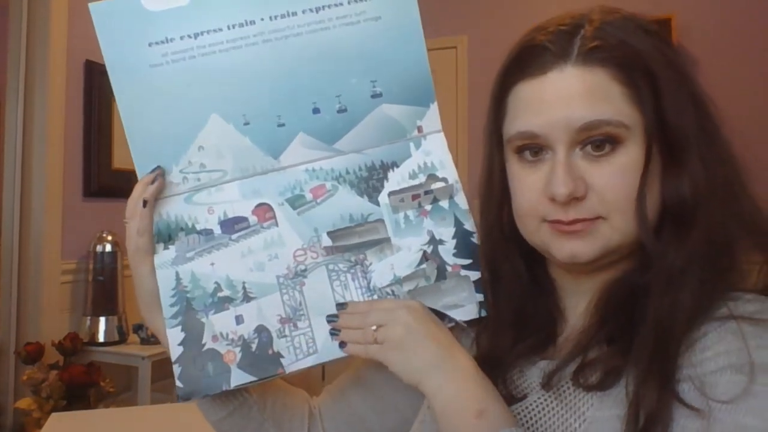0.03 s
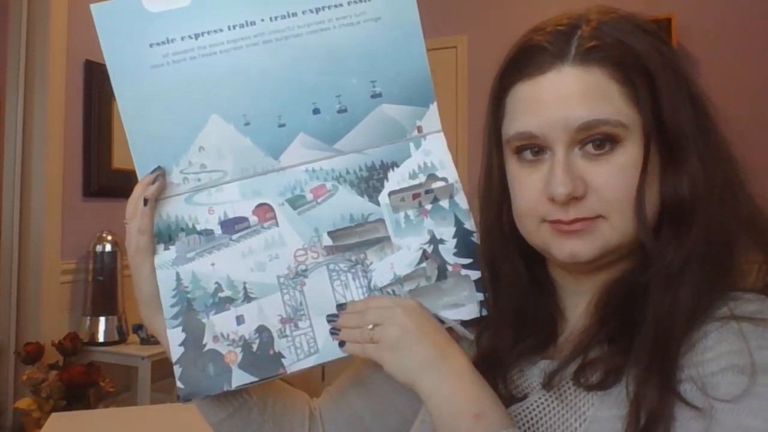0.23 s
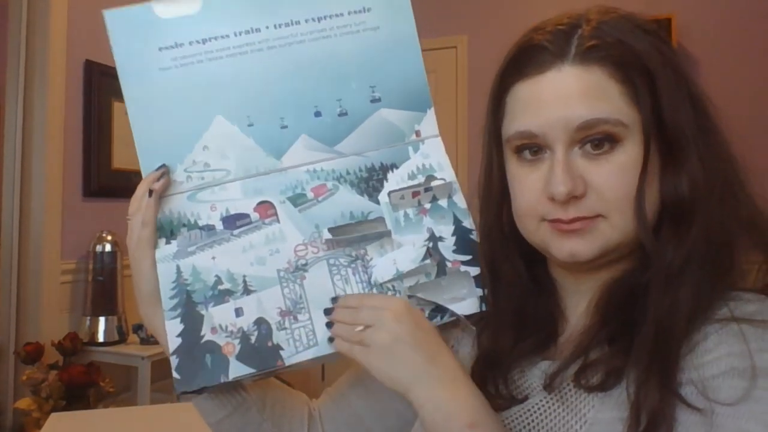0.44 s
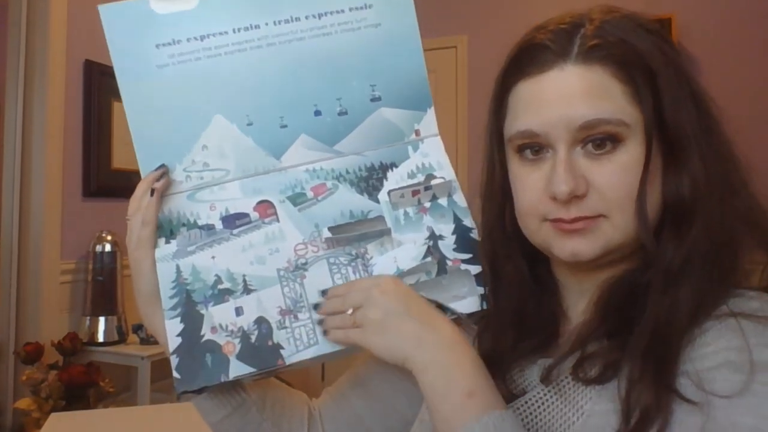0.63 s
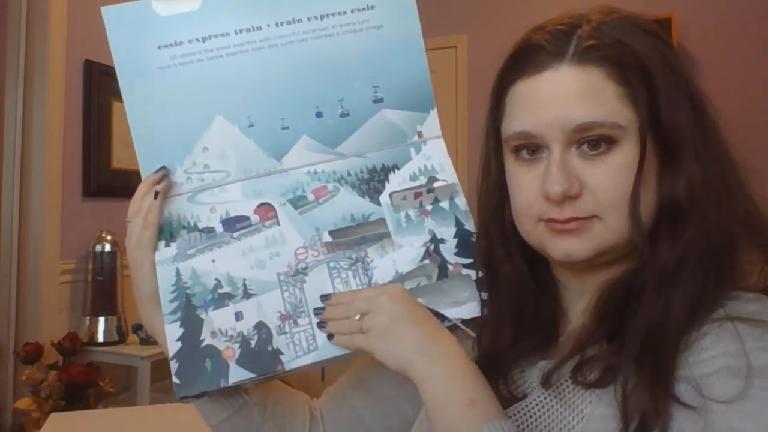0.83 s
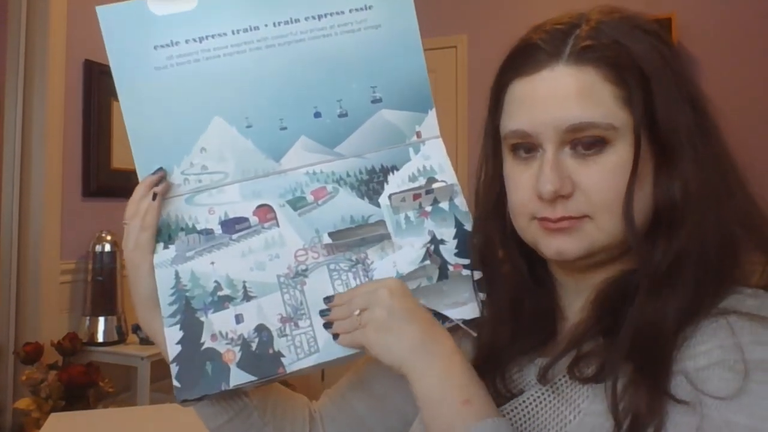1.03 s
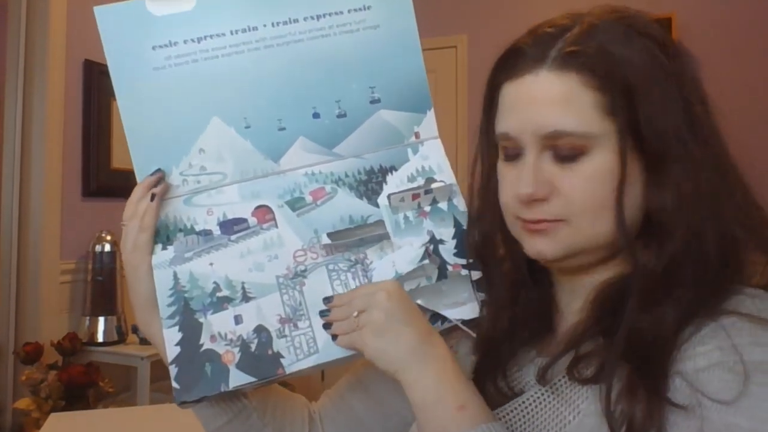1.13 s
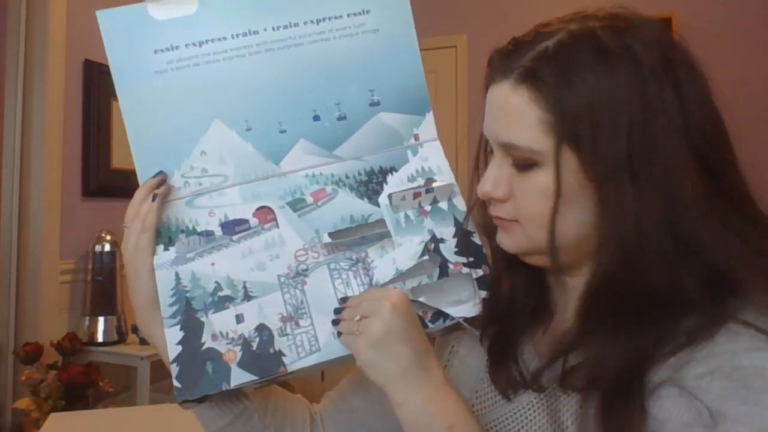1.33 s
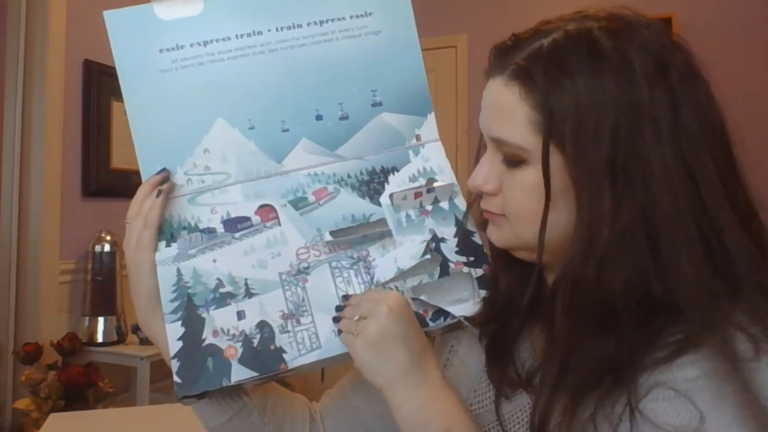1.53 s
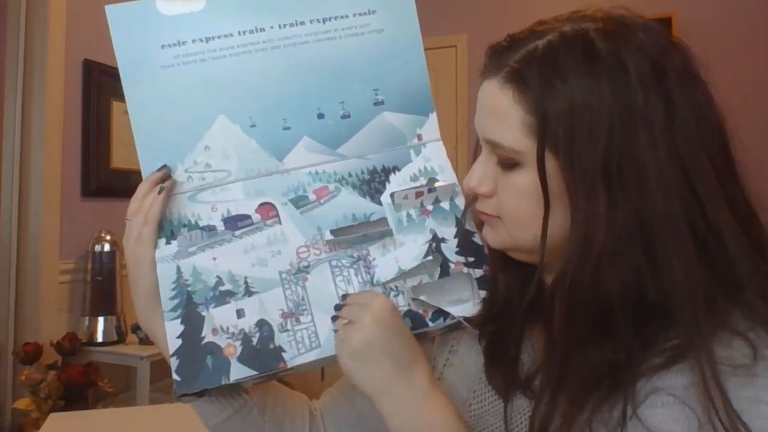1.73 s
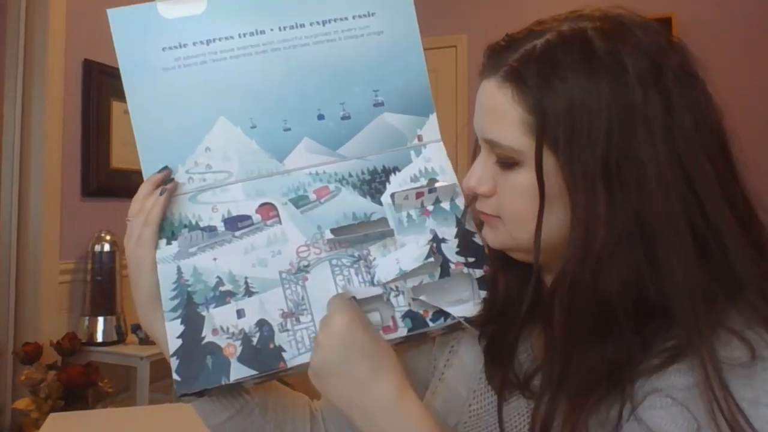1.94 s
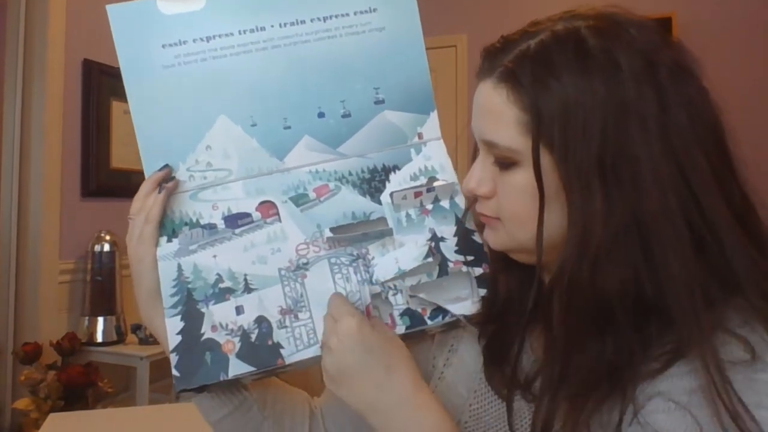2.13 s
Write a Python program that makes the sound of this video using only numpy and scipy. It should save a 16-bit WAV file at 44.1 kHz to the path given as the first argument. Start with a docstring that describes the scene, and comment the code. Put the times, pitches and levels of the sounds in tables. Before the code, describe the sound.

Fingers tear open a perforated cardboard door, with crisp pops, hollow knocks and a brief rip.

```python
"""Tearing open a cardboard box

Close to a stereo microphone in a small furnished room, fingers tear open a perforated door in stiff card.
Fibre bridges snap one by one and ring the hollow box; a longer rip crackles near the end. In between,
fingers rub, bump and knock the card. The box sits a little to the right, and the room adds a short tail."""
import sys
import numpy as np
from scipy import signal
from scipy.fft import rfft, irfft
from scipy.io import wavfile

SR = 44100
rng = np.random.default_rng(int(sys.argv[2]) if len(sys.argv) > 2 else 0)


def int16_out(signal):
    """Quantize to a 16-bit WAV file."""
    q = np.round(np.clip(np.atleast_2d(signal).T, -1, 1) * 32767)
    wavfile.write(sys.argv[1], SR, q.astype(np.int16))


N = 97020
T = np.arange(N) / SR
SIDES = np.array([[1], [-1]])  # left, right

# Fingers rubbing the card: t/s, level/dB, treble/dB re level
RUB_CURVE = [(0, -58.5, -10.5), (.14, -77, -5), (.18, -63, -22), (.52, -77.5, -13.5), (.545, -61.5, -14),
             (.67, -71.5, -7), (.70, -59.5, 3.5), (.74, -71, -4), (.78, -87, 7), (.81, -75.5, 14),
             (.82, -66.5, 9.5), (.93, -71, 6), (1.0, -40, 3), (1.2, -79, -5.5), (1.24, -60.5, -1.5),
             (1.32, -69, 6.5), (1.36, -57, -16), (1.41, -82.5, -1), (1.47, -75, 9), (1.49, -88, 36),
             (1.53, -59, -7), (2.1, -70.5, 8.5), (2.2, -79, -8)]
# Spectra of the rub, middle and treble: f/Hz, level/dB
RUB_COLOUR = [(380, -29.5), (620, 5), (2300, -1), (8000, -18)]
RUB_TREBLE_COLOUR = [(3000, -63.5), (7000, -8.5), (11000, -10), (14000, -2)]
# Modes of the hollow box: f/Hz, level/dB, t60/s
BOX_MODES = [(410.8, 7.5, 0.043), (481.7, 5, 0.036), (520, -5.5, 0.05), (601, -2.5, 0.067),
             (725, -2.5, 0.048), (875, 2.5, 0.029), (988, -16.5, 0.17), (1100, -24, 0.099),
             (1149, 3, 0.032), (1420, -9.5, .04)]
# Fibre bridges breaking: t/s, level/dB, treble/dB re level, box ring/dB re level, bite f/Hz
SNAPS = [(0.0142, -34.5, -37.5, -45.5, 2260), (.0506, -38, -29, -14, 2320),
         (.0728, -32.5, -39.5, -29.5, 2130), (.0876, -42, -13.5, -6.5, 2130),
         (0.1008, -38.5, 0.5, -7, 2170), (0.214, -3.5, -15.5, -17.5, 3350), (0.2223, -7, -24, -7.5, 2210),
         (.2314, -12, -3.5, -34, 1720), (0.8926, -38, -6, -4.5, 1920), (0.9209, -41, 2, -10.5, 2660),
         (0.9356, -38, -3.5, 2.5, 2000), (0.9798, -28.5, -9.5, -24.5, 1980), (1.0106, -7.5, -4, -14, 1596),
         (1.0194, -22.5, -5, -2, 3090), (1.0648, -17, -21, -8.5, 2050), (1.0794, -19.5, -14, -10, 2305),
         (1.1523, -46, -33.5, -21, 2220), (1.177, -38, -10, -4.5, 1460), (1.421, -41, -25.5, -16, 1417),
         (1.438, -39.5, -26, -13.5, 1910), (1.479, -40, 2.5, -46, 4520), (1.535, -2.5, -13, -13, 3060),
         (1.5372, -6.5, -10, -14.5, 2055), (1.5699, -14.5, -5, -14, 2570),
         (1.5776, -15.5, -0.5, -14.5, 3660), (1.714, -34.5, 1, -8, 4970), (1.7395, -32.5, 1, -12, 3780),
         (1.7668, -22, 0, -33, 3420), (1.7771, -15.5, 0.5, -51, 3070), (1.809, -25.5, 1, -48, 3500),
         (1.846, -25, 4, -37, 3510), (1.857, -30, -9, -31, 3300)]
# Spectra of a snap's papery middle and of the treble of snaps and rip: f/Hz, level/dB
SNAP_COLOUR = [(300, -25), (600, -6), (1500, 2.5), (3400, -2), (8000, -12), (11000, -59.5)]
TEAR_TREBLE_COLOUR = [(1500, -83.5), (4000, -3), (6000, -5.5), (13000, -0.5), (16000, 1)]
# Dull handling bumps, and the box's low ring just after some snaps: t/s, level/dB, f/Hz
BUMPS = [(0.216, -36, 175), (0.466, -44.5, 106.8), (0.507, -49, 78), (0.673, -40, 70.7), (0.697, -43, 98),
         (0.721, -37.5, 97), (0.744, -41, 31), (1.013, -33.5, 130), (1.04, -39, 49.4), (1.537, -33.5, 183),
         (1.558, -34, 171), (2.082, -48.5, 179.6)]
# Finger knocks and flexes of the box: t/s, level/dB, favoured f/Hz
KNOCKS = [(0.544, -29, 405), (.582, -33.5, 430), (0.648, -32.5, 460), (0.702, -22.5, 450.4),
          (.7035, -18.5, 875), (.723, -30, 457), (.745, -31.5, 875), (0.893, -24, 380), (0.935, -36.5, 405),
          (1.032, -12.5, 407), (1.075, -29, 416), (1.158, -31, 400), (1.254, -31.5, 1420),
          (1.437, -36, 624), (1.439, -27.5, 1100), (1.593, -37, 431), (1.775, -26, 610),
          (1.905, -28.5, 480), (1.948, -24.5, 520), (2.078, -20.5, 458), (2.09, -27.5, 478)]
# Card creasing under the fingers: t/s, level/dB
CREASES = [(.595, -49.5), (0.623, -51), (0.654, -48.5), (0.757, -48.5)]
# The long rip: t/s, level/dB, treble/dB re level
RIP_CURVE = [(1.705, -51, 1), (1.73, -41, 4), (1.765, -31.5, 2.5), (1.79, -44, 9), (1.825, -52, 2),
             (1.84, -45, 4), (1.85, -25.5, -1), (1.87, -44, 7.5), (1.91, -37.5, 5.5), (1.95, -41.5, 2.5),
             (1.99, -52.5, 10), (2.03, -90.5, 17.5)]
# Spectrum of the rip's middle: f/Hz, level/dB
RIP_COLOUR = [(400, -60), (1600, -10.5), (2030, -2), (2500, -1), (4000, -4), (8000, -7.5), (11000, -39)]
# Spectrum of the room tone: f/Hz, level/dB
ROOM_TONE = [(30, -9.5), (84, -16), (180, -16.5), (260, -28.5), (460, -42), (1250, -54.5), (3600, -42),
             (16000, -52)]
# Room decay by band: f/Hz, t60/s
ROOM_T60 = [(150, 0.22), (300, 0.2), (700, 0.34), (1800, 0.27), (4800, 0.29), (12000, 0.26)]
# Room tail in the same bands: level/dB
ROOM_DB = [20, -2.5, -1, -3.5, -4.5, -5.5]
# Stereo width in the same bands: side/mid ratio
ROOM_WIDTH = [.2, .25, .35, .6, .9, .95]

SNAP_ATTACK_S, SNAP_DECAY_S, BITE_WIDTH = 0.00037, 0.001, .24  # width as a share of the pitch
FIRM_DB, SOFT_RANGE_DB = -20, 14  # snaps under FIRM_DB turn into creaks over this range
KNOCK_ATTACK_S, KNOCK_SPREAD_OCT = 0.00584, 0.071
GRAIN_S, SLIP_FROM_S, SLIPS_PER_S = 0.00072, 1.8705, 97
ROOM_ONSET_S, PATH_SPREAD_S = 0.003, 0.0059
BODY_PAN_DB, TREBLE_PAN_DB = -1, -4  # left re right
BODY_LOW_HZ, TOP_HZ = 330, 15900


def amp(db):
    """dB to gain."""
    return 10 ** (np.asarray(db, float) / 20)


def colour(x, points):
    """Causal filter shaped by f/Hz, level/dB points, keeping the power of white noise."""
    hz, db = np.array(points, float).T
    log_gain = np.interp(np.log(np.linspace(1, SR / 2, 4097)), np.log(hz), db) * np.log(10) / 20
    cepstrum = irfft(log_gain)
    cepstrum[1:4096] *= 2  # fold to minimum phase
    cepstrum[4097:] = 0
    h = irfft(np.exp(rfft(cepstrum)))
    filtered = signal.fftconvolve(x, np.broadcast_to(h, x.shape[:-1] + h.shape), axes=-1)
    return filtered[..., :N] / np.sqrt(np.sum(h ** 2))


def add(track, at_s, x):
    """Mix a sound into a track."""
    i = int(at_s * SR)
    track[i:i + len(x)] += x[:N - i]


def box_ring(db, attack_s, favour_hz=None):
    """One blow on the hollow box: every mode rings down with a chance sign and size."""
    hz, mode_db, t60 = np.array(BOX_MODES, float).T[..., None]
    size, sign = rng.standard_normal((2, len(BOX_MODES), 1))
    gains = amp(mode_db + 2.4 * size)
    if favour_hz:
        gains = gains * np.exp(-.5 * (np.log2(hz / favour_hz) / KNOCK_SPREAD_OCT) ** 2)
    t = T[:SR // 5]
    modes = np.sign(sign) * gains * np.sin(2 * np.pi * hz * t) * 1000. ** (-t / t60)
    attack = (1 - np.exp(-t / attack_s)) ** 2
    return amp(db) * modes.sum(axis=0) * attack / np.sqrt(np.sum(gains ** 2))


def friction(curve, mid_colour, treble_colour, per_s, scatter_db, box_db):
    """Uneven fibre clicks follow a level curve and ring the box; gives middle and treble."""
    clicks = rng.random(N) < per_s / SR
    sizes = clicks * amp(scatter_db * np.minimum(rng.exponential(size=N), 3))
    grain = np.exp(-T[:SR // 100] / GRAIN_S)
    crackle = np.sqrt(np.convolve(sizes ** 2, grain)[:N]) * rng.standard_normal(N)
    crackle /= np.sqrt(np.mean(crackle ** 2))
    times, db, treble_db = np.array(curve, float).T
    mid = crackle * amp(np.interp(T, times, db, -140, -140))
    treble = crackle * amp(np.interp(T, times, db + treble_db, -140, -140))
    response = np.diff(box_ring(0, SNAP_ATTACK_S))
    box = signal.fftconvolve(mid, response)[:N] * amp(box_db) / np.sqrt(np.sum(response ** 2))
    return np.array([colour(mid, mid_colour) + box, colour(treble, treble_colour)])


def finger_rub():
    """Fingers slide over the card: a quiet, fairly even grain."""
    return friction(RUB_CURVE, RUB_COLOUR, RUB_TREBLE_COLOUR, per_s=420, scatter_db=1.5, box_db=0.5)


def fibre_snaps(rows):
    """Fibres give way: a papery burst with a pitched bite rings the box; gives middle and treble."""
    paper, treble, box = np.zeros((3, N))
    t = T[:SR // 20]
    for at_s, db, treble_db, box_db, hz in rows:
        soft = np.clip((FIRM_DB - db) / SOFT_RANGE_DB, 0, 1)
        slowed = t / (1 + 2.2 * soft)  # soft creaks last longer and lose their papery middle
        shape = (1 - np.exp(-slowed / SNAP_ATTACK_S)) ** 2 * np.exp(-slowed / SNAP_DECAY_S)
        bursts = shape * rng.standard_normal((3, len(t)))
        bite = soft * bursts[2] + (1 - soft) * np.abs(bursts[2]) * np.sin(2 * np.pi * hz * t)
        bursts[2] = signal.lfilter(*signal.iirpeak(hz, (1 + soft) / BITE_WIDTH, fs=SR), bite)
        bursts *= np.sqrt(np.sum(shape ** 2) / np.sum(bursts ** 2, axis=1, keepdims=True))
        add(paper, at_s, amp(db + 1.5 - 12 * soft) * bursts[0])
        add(treble, at_s, amp(db + treble_db + 8.5) * bursts[1])
        add(box, at_s, box_ring(db + box_db + 0.5, SNAP_ATTACK_S))
        add(box, at_s, amp(db) * bursts[2])
    return np.array([colour(paper, SNAP_COLOUR) + box, colour(treble, TEAR_TREBLE_COLOUR)])


def low_bumps():
    """The box gives dull low bumps, from handling or ringing low after a snap: a cycle or two of a low tone
    that swells and dies, in stereo."""
    low = np.zeros(N)
    for at_s, db, hz in BUMPS:
        cycles = T[:SR // 4] * hz
        swell = cycles / .7 * np.exp(1 - cycles / .7)
        add(low, at_s, amp(db) * swell * np.sin(2 * np.pi * cycles))
    return low + 0.27 * SIDES * np.roll(low, SR // 100)


def finger_knocks():
    """Soft contacts wake the box modes near their own pitch."""
    box = np.zeros(N)
    for at_s, db, hz in KNOCKS:
        add(box, at_s - KNOCK_ATTACK_S, box_ring(db + 3.5, KNOCK_ATTACK_S, hz))
    return box


def crease_ticks():
    """The card ticks faintly as it creases; gives snap rows."""
    return [(at_s, db, -18, 0, 1700) for at_s, db in CREASES]


def long_rip():
    """The tear runs on through the fibres: a dense, ragged crackle."""
    return friction(RIP_CURVE, RIP_COLOUR, TEAR_TREBLE_COLOUR, per_s=8800, scatter_db=5, box_db=-13.5)


def tear_slips():
    """The tear catches and lets go in nine near-regular jerks; gives snap rows."""
    return [(SLIP_FROM_S + (k + .06 * lag) / SLIPS_PER_S, -27 + 2 * size, -14, -25,
             2050 * (1 + .05 * pitch))
            for k, (lag, size, pitch) in enumerate(rng.standard_normal((9, 3)))]


def room_tail(x):
    """The room's short reverberation fades band by band, wider in the treble."""
    hz, t60 = np.array(ROOM_T60).T
    t = T[:SR // 2]
    log_hz = np.log(np.linspace(1, SR / 2, len(t) // 2 + 1))
    tail = 0
    for k in range(len(hz)):
        band = np.sqrt(np.interp(log_hz, np.log(hz), np.arange(len(hz)) == k))
        mid, side = irfft(rfft(rng.standard_normal((2, len(t)))) * band)
        fade = 1000. ** (-t / t60[k]) * np.clip(t / ROOM_ONSET_S, 0, 1)
        fade /= np.sqrt(np.sum(fade ** 2))
        tail = tail + amp(ROOM_DB[k]) * fade * (mid + ROOM_WIDTH[k] * side * SIDES)
    return signal.fftconvolve(x[None], tail, axes=-1)[:, :N]


def scene():
    """At the microphone: the card close and a little to the right, its room tail, faint room tone."""
    mid, top = fibre_snaps(SNAPS + crease_ticks() + tear_slips()) + long_rip() + finger_rub()
    knocks = finger_knocks()
    # the wide card reaches the two capsules by slightly different paths
    paths = rng.standard_normal(SR // 20) * np.exp(-T[:SR // 20] / PATH_SPREAD_S)
    side = amp(0.5) * np.convolve(top, paths)[:N] / np.sqrt(np.sum(paths ** 2))
    treble = top + SIDES * side + room_tail(top)
    body = mid + knocks + room_tail(mid + amp(-8) * knocks)
    # the body keeps little below about 330 Hz
    body = signal.sosfilt(signal.butter(4, BODY_LOW_HZ, "high", fs=SR, output="sos"), body)
    card = body * amp(BODY_PAN_DB * SIDES / 2) + treble * amp(TREBLE_PAN_DB * SIDES / 2)
    room_tone = colour(rng.standard_normal((2, N)), ROOM_TONE) * amp(-64.5)
    return card + low_bumps() + room_tone[0] + .5 * room_tone[1] * SIDES


def record(dry):
    """The recorder cuts the top steeply."""
    return signal.sosfilt(signal.ellip(10, .2, 80, TOP_HZ, fs=SR, output="sos"), dry)


dry = scene()
out = record(dry)
int16_out(out)
```